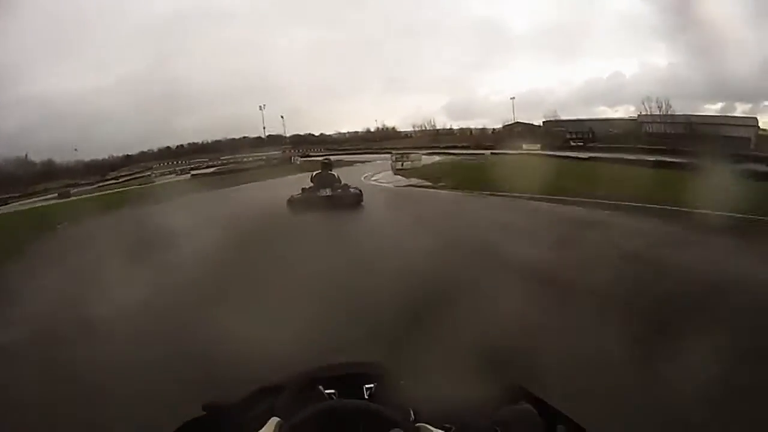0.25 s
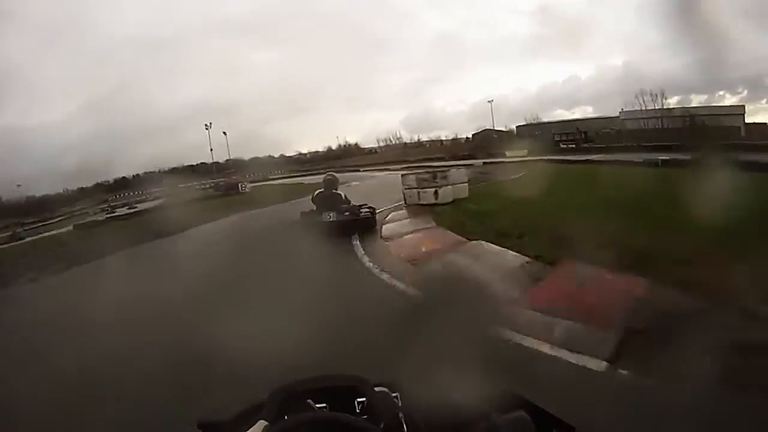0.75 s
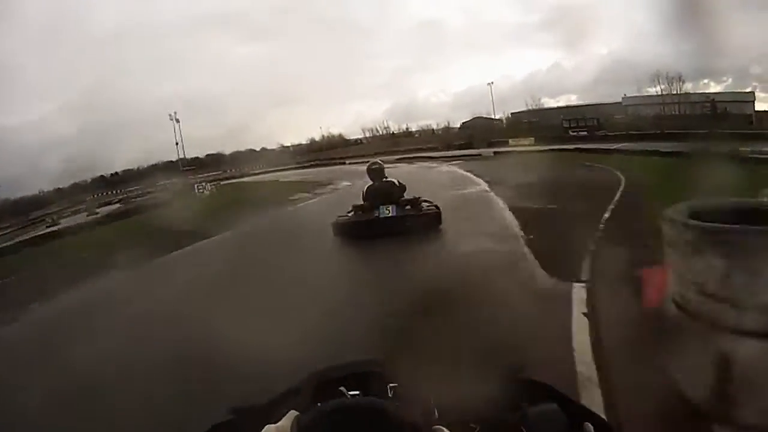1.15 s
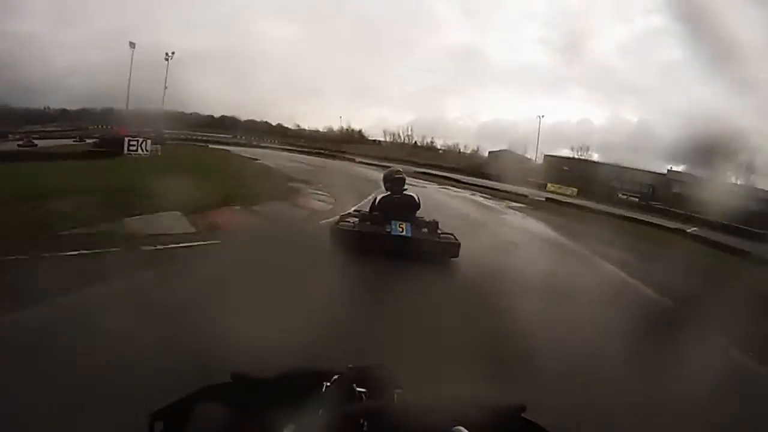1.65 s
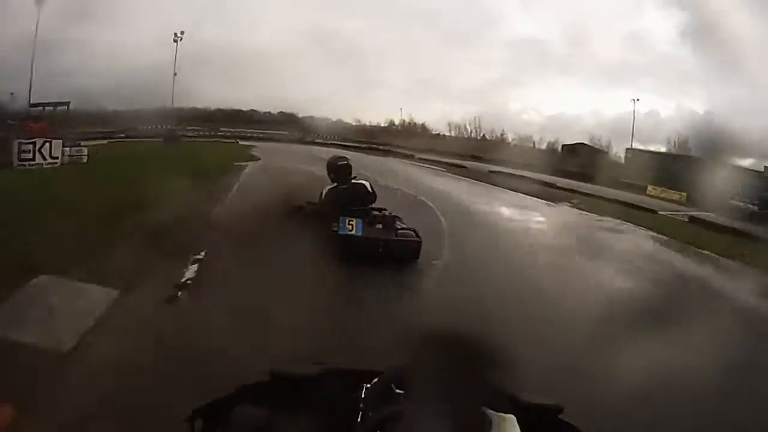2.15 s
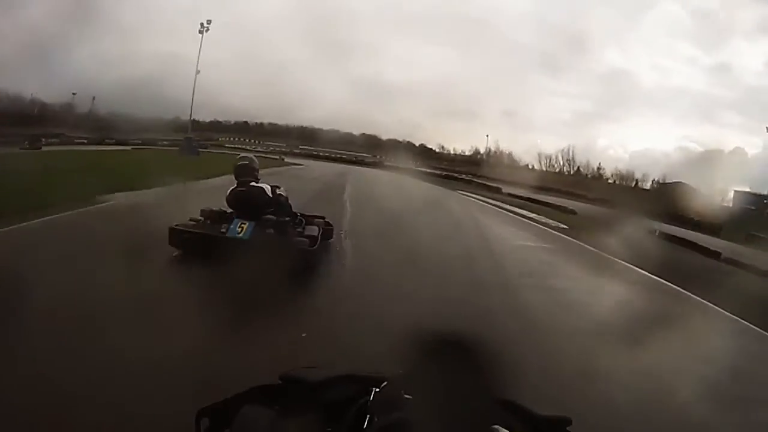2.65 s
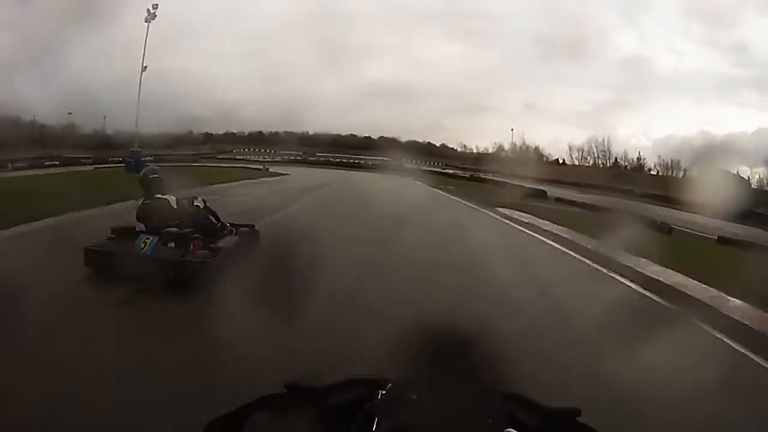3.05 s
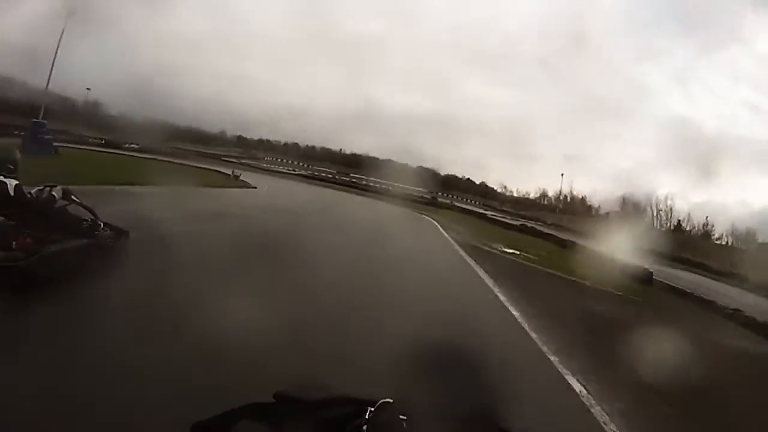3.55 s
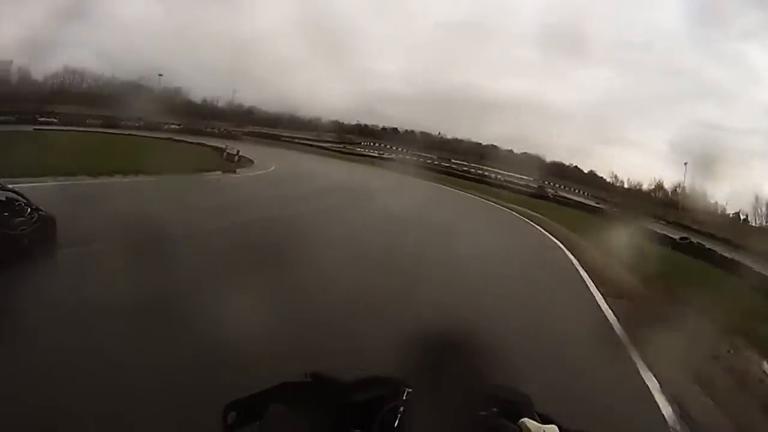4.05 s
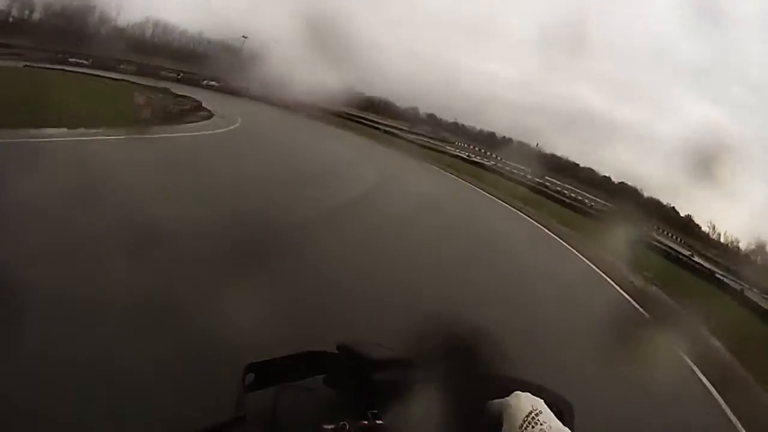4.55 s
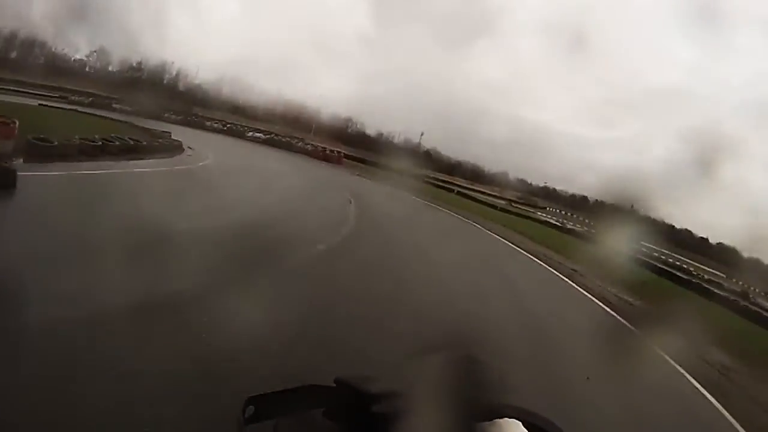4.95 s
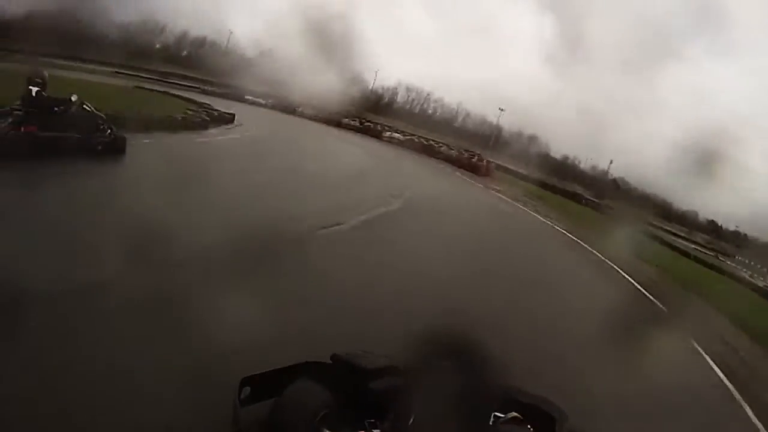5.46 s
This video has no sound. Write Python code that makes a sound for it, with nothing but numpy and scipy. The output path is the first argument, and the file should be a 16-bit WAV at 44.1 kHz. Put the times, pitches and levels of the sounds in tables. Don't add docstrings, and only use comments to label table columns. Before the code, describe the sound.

Close, boxy wind roar and deep booming gusts fill a sealed helmet camera on a wet kart track. Drops slap the housing, then another kart's raspy exhaust pulls away ahead while the near small engine hums under power. Bright sheets of spray hiss past, the rasp stops, and finally the near engine slows to a low throb among bumps and drops.

```python
import sys
import numpy as np
from scipy import signal
from scipy.fft import rfft, irfft, next_fast_len
from scipy.io import wavfile
from scipy.ndimage import uniform_filter1d, map_coordinates

SR = 44100
rng = np.random.default_rng(int(sys.argv[2]) if len(sys.argv) > 2 else 0)


def inscribe(sig):
    pcm = np.round(np.clip(np.atleast_2d(sig).T, -1, 1) * 32767)
    wavfile.write(sys.argv[1], SR, pcm.astype(np.int16))


def invert_db(level):
    return 10 ** (np.asarray(level, dtype=float) / 20)


N = 251370
TIME = np.arange(N) / SR

# centre in seconds, level in dB, half length in seconds, pitch in Hz.
GUSTS = [(-0.001, -9, 0.056, 72), (0.196, -17.5, 0.02, 69.2), (0.288, -18, 0.025, 71.4),
         (0.453, -25.1, 0.015, 71.4), (0.553, -23.5, 0.097, 69.0), (0.71, -20, 0.013, 74.96),
         (0.838, -28, 0.06, 75.2), (1.04, -27, 0.064, 66.5), (1.172, -23, 0.029, 71.8),
         (1.292, -24, 0.021, 73.37), (1.436, -18, 0.015, 69.5), (1.52, -23.5, 0.078, 70.6),
         (1.772, -10, 0.012, 72.7), (1.916, -19.5, 0.037, 74.35), (2.16, -22.5, 0.053, 72.54),
         (2.309, -13.0, 0.041, 75.96), (2.458, -20.5, 0.037, 70.46), (2.619, -14, 0.063, 70.54),
         (2.755, -11, 0.014, 68.8), (2.848, -9, 0.02, 75.7), (2.994, -12.3, 0.051, 77),
         (3.292, -10.9, 0.034, 75.1), (3.481, -20, 0.14, 75.7), (3.8, -9.5, 0.035, 73.9),
         (3.983, -14, 0.051, 66.4), (4.14, -16.5, 0.045, 71.47), (4.41, -12.5, 0.09, 70.1),
         (4.73, -23.5, 0.061, 71.76), (5.036, -27.0, 0.1, 71.26), (5.381, -19.5, 0.058, 71.4)]
# time in seconds, strength in dB.
AIRFLOW = [
    (0.0, -25),
    (0.32, -26),
    (1.43, -22),
    (1.95, -21.5),
    (2.18, -22),
    (2.51, -21.5),
    (2.81, -23.5),
    (3.68, -24),
    (5.19, -30),
    (5.7, -31),
]
# centre in seconds, dB over the buffet, half length in seconds.
BUMPS = [
    (1.44, 6, .02),
    (2.33, 4.5, .05),
    (2.66, 3.5, .05),
    (3.2, 3.5, .06),
    (3.77, 8, .03),
    (4.27, 7, .04),
]
# frequency in Hz, density in dB per Hz.
SHELL_SPECTRUM = [(200, -62), (350, -12.5), (450, -14), (820, -18), (1090, -14.5), (1300, -3), (1560, 3),
                  (1800, -2.5), (2040, -7.5), (2540, -8.5), (3100, -15.5), (5000, -20.5), (8000, -33),
                  (15400, -45)]
# frequency in Hz, density in dB per Hz.
BUFFET_SPECTRUM = [(11, -36), (18, -17), (32, -20.5), (50, -10), (75, -11), (95, -10.5), (112, -22.5),
                   (135, -25.5), (185, -22.5), (225, -28), (265, -24.5), (330, -33), (500, -44.5),
                   (700, -89)]
# time in seconds, firings per second.
OWN_RATE = [(0, 34.3), (.55, 33.85), (1.05, 33.1), (1.35, 34.2), (1.7, 33.8), (2.24, 35), (2.4, 35.25),
            (2.84, 35.55), (3, 35.33), (3.52, 36), (3.58, 35.9), (3.8, 33.5), (4.15, 30.6), (4.8, 25.8),
            (5.7, 21.6)]
# multiple of the firing rate, level in dB.
EXHAUST_ORDERS = [(1, -4), (2, -9), (3, -6), (5, -2), (6, -5), (7, -7), (8, -4), (9, -14), (10, -9),
                  (11, 0), (12, -9), (13, 0), (14, -2), (15, -11), (16, -11), (17, -7), (18, -8), (19, -10),
                  (21, -9), (22, -11), (24, -19), (30, -26)]
# time in seconds, firings so far.
AHEAD_FIRINGS = [
    (.405, -.3),
    (.695, 8),
    (.898, 14),
    (1.297, 26),
    (1.693, 38),
    (1.916, 45),
    (2.168, 53),
    (2.416, 61),
    (2.745, 71.54),
]
# time in seconds, puff level in dB.
AHEAD_PUFFS = [
    (.41, -33),
    (.62, -27),
    (.85, -32.5),
    (1.2, -26.5),
    (1.6, -30),
    (1.97, -28),
    (2.15, -23.5),
    (2.4, -27),
    (2.75, -27.5),
]
# frequency in Hz, density in dB per Hz.
BARK_SPECTRUM = [(500, -2), (1000, -17), (1560, 11.5), (2300, 2), (3200, -0.5), (4800, -4.5), (7000, -6.5),
                 (9000, -18), (12000, -21.5), (15400, -39)]
# start in seconds, length in seconds, level in dB.
SPLASHES = [
    (1.465, 0.062, -35.5),
    (1.611, 0.044, -32.5),
    (1.66, 0.11, -43),
    (1.749, 0.044, -35.5),
    (1.8, 0.059, -31.5),
    (1.858, .06, -39.5),
    (2.444, 0.019, -30),
    (2.497, 0.063, -37),
]
# frequency in Hz, level in dB.
WET_SPECTRUM = [(1500, 5), (3000, 4.5), (5000, 0.5), (7000, -3), (10000, -7.5), (12000, -13), (15400, -23)]
# start in
# seconds, peak in dB, low part in dB over the peak.
DROPS = [(0.0014, -7, 6), (0.0107, -14, 0), (0.0354, -24, 20.5), (0.387, -20.5, 16.5), (0.4136, -27, 28.5),
         (0.5038, -17.5, 13), (0.6568, -22, 21), (0.808, -7.5, 7.5), (1.455, -18, 18), (1.4774, -15, 5),
         (1.576, -6.5, -12), (1.7099, -7, -1), (1.7496, -15.5, 14.5), (1.7674, -14, -4), (1.8294, -19, -5),
         (1.891, -16, 4), (2.4454, -8, 10), (3.429, -37, 9), (3.4601, -20, 12), (3.671, -8, 11.5),
         (3.6968, -27, 14), (4.1934, -17, 11), (4.2239, -14, 12), (4.4643, -19, 15), (4.7105, -31, 28.5),
         (5.1485, -26, 18), (5.2802, -25, 16), (5.5892, -23.5, 13.5), (5.6361, -14.5, 9),
         (5.6791, -18, 16.5)]
# start in seconds, peak in dB, pitch in Hz.
CHIRPS = [
    (0.1431, -41, 9560),
    (0.1594, -34.5, 9490),
    (0.1735, -28, 9500),
    (0.2633, -60, 9200),
    (3.697, -28, 9500),
    (4.776, -33, 9040),
    (4.9708, -38, 9370),
    (5.1553, -35, 9160),
    (5.315, -35, 9880),
    (5.3912, -33, 9630),
]
# frequency in Hz, level in dB.
WALL = [
    (9800, 0),
    (11500, -3.5),
    (12800, -8),
    (15400, -7),
]
# frequency in Hz, level in dB.
HOUSING = [(2900, 0), (3230, -4), (3480, 3), (3800, -1), (5350, 1.5), (5950, -6), (6450, 2), (7200, 2),
           (7800, -2.5), (9550, 2), (9900, -2), (11200, 1), (12800, -1.5), (15400, 0)]
# frequency in Hz, level in dB.
WIDTH = [(30, -40), (60, -62), (110, -44), (200, -35), (370, -29), (690, -24), (1270, -39), (2340, -28),
         (4310, -20.5), (7930, -17.5), (14600, -21)]

CALM_DB = -32.5
BUFFET_DB, BUFFET_AIR, BUFFET_GUST = -24, 0.6, 0.24
PEDAL_DOWN_S, PEDAL_UP_S, PEDAL_MOVE_S = 1.06, 3.55, 0.019
DAB_S, DAB_SPREAD_S, DAB_SHARE = 0.53, 0.17, 0.87
COAST_DB, PULL_DB = -51, -40.5
FADE_DB_PER_HZ = 1.5
THROB_DB, THROB_AT_S, THROB_SPREAD_S, THROB_REST_DB = -26.5, 4.4, 0.8, -43.5
BREATH_DB, BREATH_AT_S, BREATH_SPREAD_S, BREATH_REST_DB = -32.5, 3.1, 0.76, -44
SPLASH_RISE_S, SPLASH_FALL_S = 0.0086, 0.041
MIST_DB, MIST_AIR = -48.5, 2.15
DROP_T60_S, CHIRP_T60_S = 0.02, 0.03


def boom(swing):
    hz, = curves([(s, hz) for s, _, _, hz in GUSTS])
    turns = np.cumsum(hz + 4 * wobble(26)) / SR
    return swing * invert_db(2.7 + 1.6 * wobble(22)) * np.sin(2 * np.pi * turns)


def wind(swing):
    roar_db, = curves(AIRFLOW)
    roar_db = roar_db + 0.59 + 0.62 * wobble(14) + 0.77 * wobble(70)
    roar = invert_db(roar_db) * patchy(hiss(SHELL_SPECTRUM, tilt_db=0.34), patchy_db=1.18)
    gust_db = 20 * np.log10(swing)
    buffet_db = BUFFET_DB + BUFFET_AIR * airflow_db() + BUFFET_GUST * (gust_db - gust_db.mean())
    bumps_db = sum(db * bell(s, half) for s, db, half in BUMPS)
    buffet = invert_db(buffet_db + bumps_db + 0.69 * wobble(15)) * hiss(BUFFET_SPECTRUM)
    return roar + buffet


def gusts():
    return invert_db(CALM_DB) + sum(invert_db(db) * bell(s, half) for s, db, half, _ in GUSTS)


def airflow_db():
    db, = curves(AIRFLOW)
    return db - db.mean()


def own_engine():
    rate, = curves(OWN_RATE)
    firings = np.cumsum(rate) / SR + 0.289

    pedal = step(PEDAL_DOWN_S, PEDAL_MOVE_S) - step(PEDAL_UP_S, PEDAL_MOVE_S)
    pedal = pedal + DAB_SHARE * bell(DAB_S, DAB_SPREAD_S)
    hum_db = COAST_DB + (PULL_DB - COAST_DB) * pedal + FADE_DB_PER_HZ * np.minimum(rate - 35.3, 0)
    order, order_db = np.transpose(EXHAUST_ORDERS)
    sway_db = [0.9 * wobble(8) for _ in range(5)]
    hum = 0
    for n in range(1, 31):
        phase = 2 * np.pi * rng.random()
        level = invert_db(np.interp(n, order, order_db) + sway_db[n % 5])
        hum = hum + level * np.sin(2 * np.pi * n * firings + phase)

    throb_db = THROB_REST_DB + (THROB_DB - THROB_REST_DB) * bell(THROB_AT_S, THROB_SPREAD_S)
    throb = np.sin(4 * np.pi * firings)

    breath_db = BREATH_REST_DB + (BREATH_DB - BREATH_REST_DB) * bell(BREATH_AT_S, BREATH_SPREAD_S)
    breath_noise = patchy(hiss(SHELL_SPECTRUM, tilt_db=4.3), patchy_db=2.5)
    breath = puffs(firings, sharp=0.9, scatter_db=1.2) * breath_noise
    return invert_db(hum_db + 3) * hum + invert_db(throb_db + 3) * throb + invert_db(breath_db + 6) * breath


def firing_sizes(firings, scatter_db):
    sizes = invert_db(scatter_db * rng.standard_normal(400))
    return sizes[np.floor(firings + 0.5).astype(int)]


def puffs(firings, sharp, scatter_db):
    return firing_sizes(firings, scatter_db) * np.exp(sharp * (np.cos(2 * np.pi * firings) - 1))


def kart_ahead():
    firings, = curves(AHEAD_FIRINGS)
    is_open = step(AHEAD_FIRINGS[0][0], 0.003) - step(AHEAD_FIRINGS[-1][0], 0.003)
    puff_db, = curves(AHEAD_PUFFS)
    bark = barks(firings + 1.03, rise=0.055, fall=0.12, scatter_db=1.2)
    return is_open * invert_db(puff_db + 8.5) * bark * patchy(hiss(BARK_SPECTRUM), patchy_db=1.0)


def barks(firings, rise, fall, scatter_db):
    late = (firings + 0.5) % 1 - 0.5
    return firing_sizes(firings, scatter_db) * np.exp(-(late / np.where(late < 0, rise, fall)) ** 2)


def spray():
    sheets = 0
    for start, length, db in SPLASHES:
        sheets = sheets + invert_db(db) * step(start, SPLASH_RISE_S) * (1 - step(start + length, SPLASH_FALL_S))
    mist = invert_db(MIST_DB + MIST_AIR * airflow_db())
    near = sheets * droplets(tilt_db=1.5)
    far = mist * colour(droplets(tilt_db=-0.26), WALL)
    return invert_db(7.5 + 0.82 * wobble(45)) * (near + far)


def droplets(tilt_db):
    hit = rng.random(N) < 900 / SR
    tick_db = 0.95 * np.minimum(rng.exponential(size=N), 3.5)
    ticks = hit * invert_db(tick_db) * rng.standard_normal(N)
    water = 0.78 * unit(ticks) + 0.61 * rng.standard_normal(N)
    return patchy(colour(water, WET_SPECTRUM, tilt_db), patchy_db=2.0)


def drops():
    high, low, ring = np.zeros((3, N + SR))
    t = np.arange(900) / SR
    for s, db, low_db in DROPS:
        i = round(s * SR)
        burst = invert_db(db - 60 * t / DROP_T60_S) * (1 - np.exp(-t / 0.0021))
        high[i:i + len(t)] += burst
        low[i:i + len(t)] += invert_db(low_db) * burst
    for s, db, hz in CHIRPS:
        i = round(s * SR)
        swell = invert_db(db - 60 * t / CHIRP_T60_S) * (1 - np.exp(-t / 0.0012))
        ring[i:i + len(t)] += swell * np.sin(2 * np.pi * hz * t * (1 - 1.2 * t))
    snap = high[:N] * hiss(WET_SPECTRUM, tilt_db=1.5)
    knock = invert_db(10) * colour(low[:N] * rng.standard_normal(N), SHELL_SPECTRUM)
    return invert_db(-6) * snap + invert_db(-3) * knock + invert_db(-5) * ring[:N]


def unit(x):
    return x / np.sqrt(np.mean(x ** 2) + 1e-20)


def curves(rows):
    s, *cols = np.transpose(rows)
    return [np.interp(TIME, s, c) for c in cols]


def wobble(rate):
    return map_coordinates(rng.standard_normal(2000), [TIME * rate])


def bell(at_s, spread_s):
    return np.exp(-0.5 * ((TIME - at_s) / spread_s) ** 2)


def step(at_s, move_s):
    return 0.5 + 0.5 * np.tanh((TIME - at_s) / move_s)


def colour(x, points, tilt_db=0):
    m = next_fast_len(N + 8192)
    hz = np.fft.rfftfreq(m, 1 / SR) + 1
    f, db = np.transpose(points)
    gain_db = np.interp(np.log(hz), np.log(f), db) + tilt_db * np.log2(hz / 2000)
    return irfft(rfft(x, m) * invert_db(gain_db), m)[:N]


def hiss(points, tilt_db=0):
    return unit(colour(rng.standard_normal(N), points, tilt_db))


def patchy(x, patchy_db):
    z = signal.stft(x, nperseg=256)[2]
    field = uniform_filter1d(rng.standard_normal(z.shape), size=5, axis=0)
    field = uniform_filter1d(field, size=4, axis=1)
    return unit(signal.istft(z * invert_db(patchy_db * unit(field)), nperseg=256)[1][:N])


def stereo(mid):
    z = signal.stft(colour(np.roll(mid, SR // 100), WIDTH), nperseg=1024)[2]
    chance = rng.standard_normal(z.shape)
    bands = uniform_filter1d(uniform_filter1d(chance, size=24, axis=0), size=3, axis=1)
    spells = unit(uniform_filter1d(chance[0], size=3)) + 0.8 * unit(bands)
    side = invert_db(6) * signal.istft(z * (spells > 0.85), nperseg=1024)[1][:N]
    return np.array([mid + side, mid - side])


def scene():
    swing = gusts()
    through_wall = colour(boom(swing) + wind(swing) + own_engine(), WALL)
    return stereo(colour(through_wall + spray() + kart_ahead() + drops(), HOUSING))


def low_pass(x):
    return signal.sosfilt(signal.butter(12, 15210, fs=SR, output="sos"), x)


def record(dry):
    soft = dry / (1 + np.abs(dry / 0.85) ** 6) ** (1 / 6)
    return low_pass(soft)


dry = scene()
out = record(dry)
inscribe(out)
```